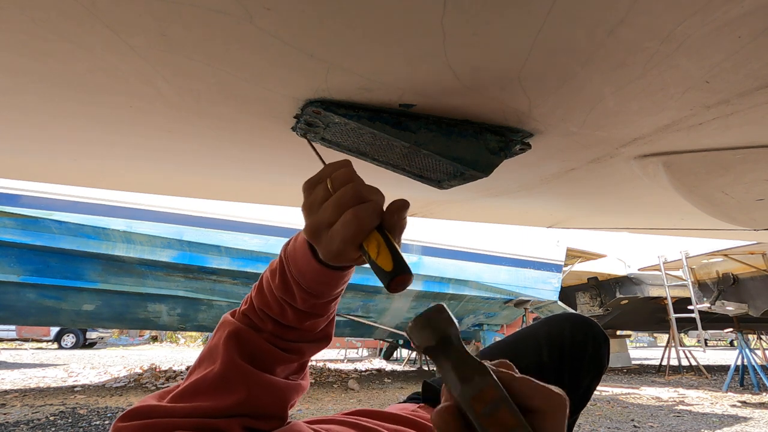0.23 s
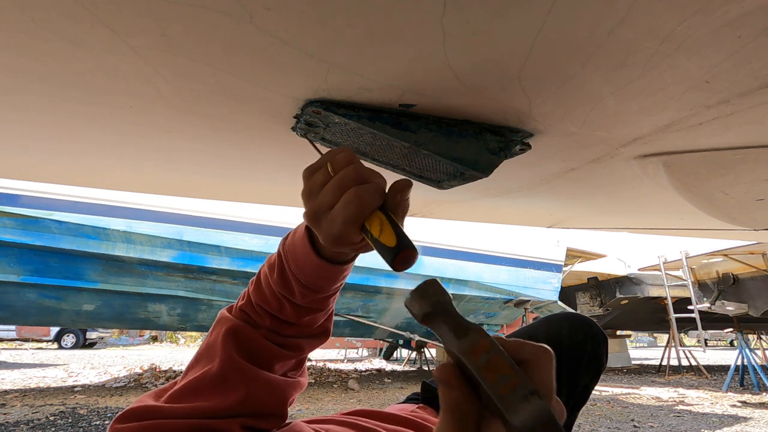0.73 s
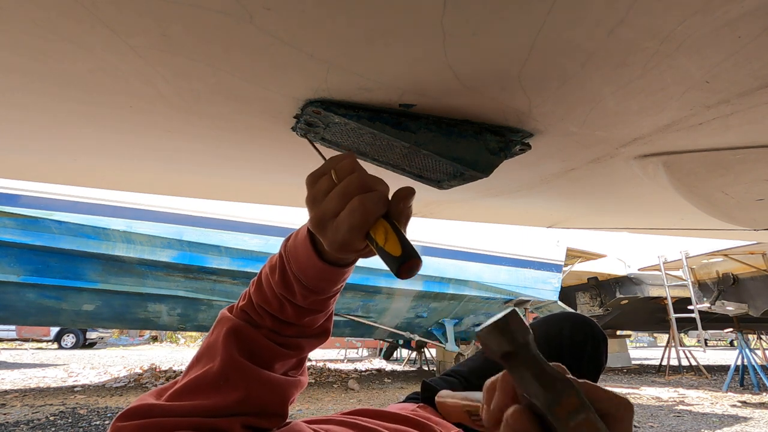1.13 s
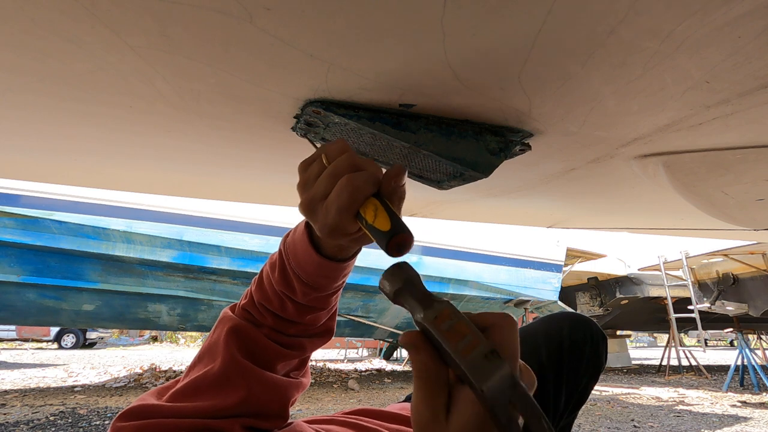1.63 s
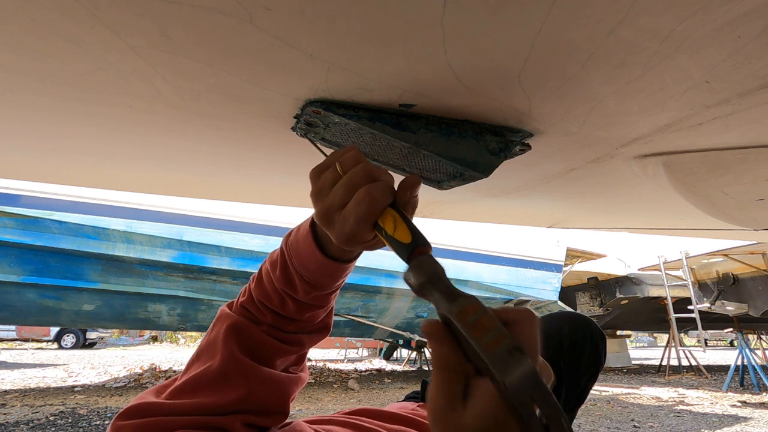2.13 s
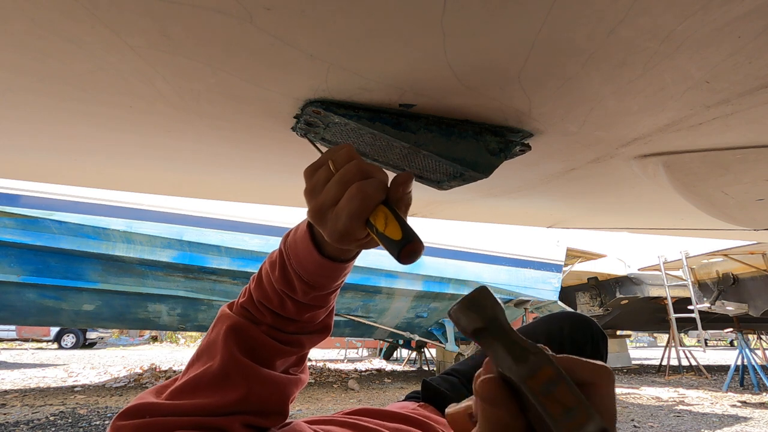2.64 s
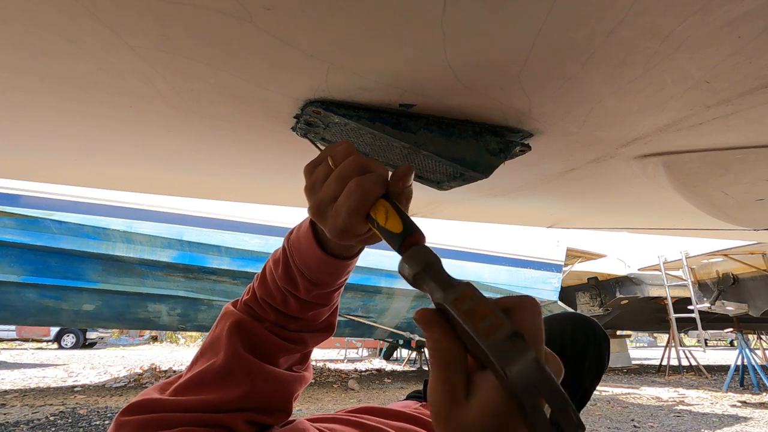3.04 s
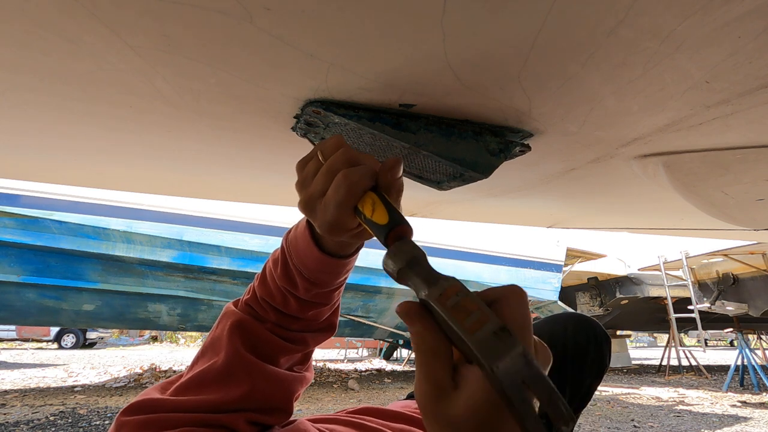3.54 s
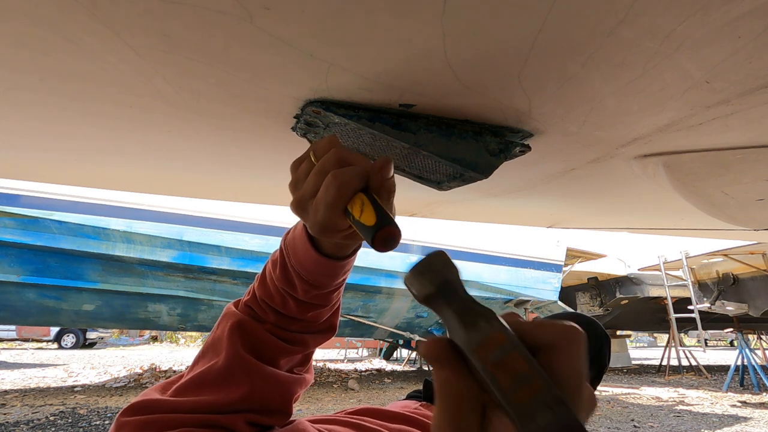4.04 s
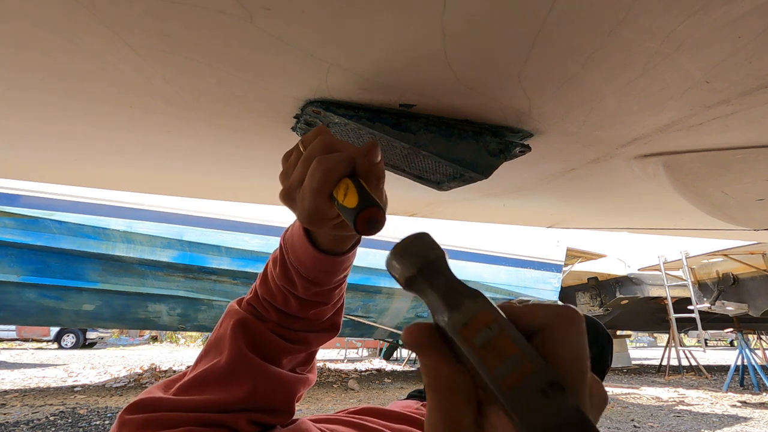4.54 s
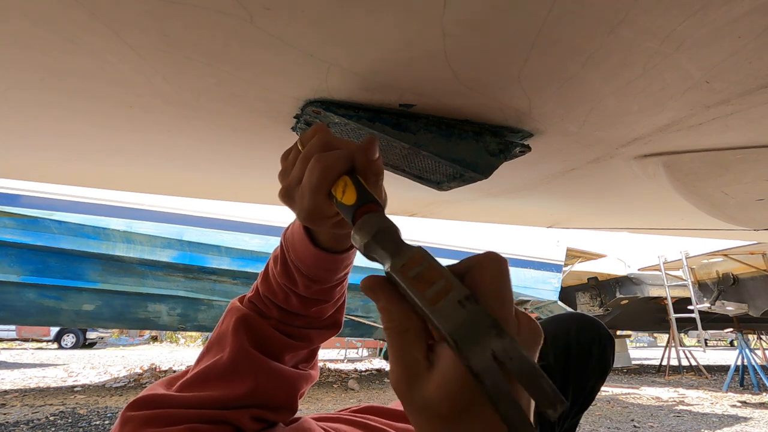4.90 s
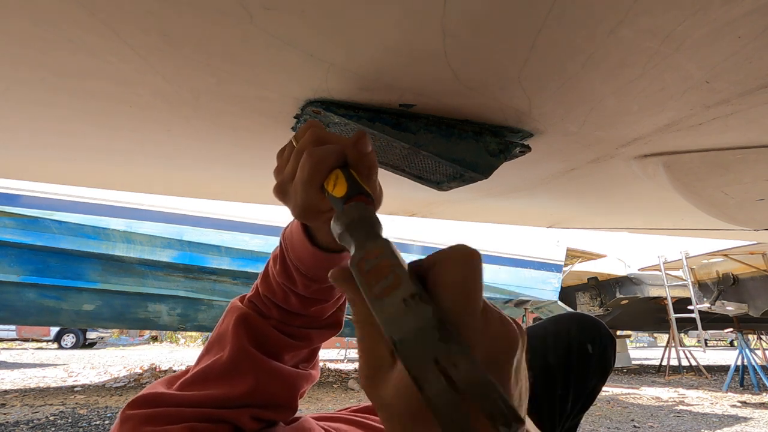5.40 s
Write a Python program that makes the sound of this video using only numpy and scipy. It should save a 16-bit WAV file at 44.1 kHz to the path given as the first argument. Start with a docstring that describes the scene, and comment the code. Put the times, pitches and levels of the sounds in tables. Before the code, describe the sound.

Even hammer taps on a screwdriver clack and drum against a hollow boat hull, echoing briefly beneath it.

```python
"""Freeing a stuck hull screw

Under a laid-up boat, a hammer taps a screwdriver handle in an even run. Each tap clacks on the handle,
drums the fibreglass hull and echoes under the boat. Blade and swinging hammer head ring faintly;
the tip chatters and ticks in the slot between taps, over quiet boatyard air."""
import sys
import numpy as np
from scipy import signal
from scipy.fft import rfft, irfft
from scipy.io import wavfile

SR = 44100
rng = np.random.default_rng(int(sys.argv[2]) if len(sys.argv) > 2 else 0)


def wav_record(signal):
    """Record a signal, one row per channel, as 16-bit PCM in the file named by sys.argv[1]."""
    frames = np.transpose(np.atleast_2d(signal))
    bounded = np.clip(frames, -1, 1)
    # unit amplitude maps onto the largest positive 16-bit level
    quanta = np.round(bounded * 32767).astype(np.int16)
    wavfile.write(sys.argv[1], SR, quanta)


N = 249779

# hammer blows (time [s], strength [dB], glancing edge [dB], blade ring [dB], head ring [dB])
TAPS = [(-0.15, 1.5, 0, 0, -2), (0.1543, -2, -7, -8.5, -6), (0.436, -2, 7.5, -0.5, 2),
        (0.744, -2.1, 0.5, -3, -8), (1.039, -1.3, -3.5, -1, -5.5), (1.349, -1.5, 2.5, -2.5, -1.5),
        (1.678, -1.4, -3.5, -2, 1.7), (1.9865, -1.55, -2.5, -0.5, 5.5), (2.279, -1.5, -1.5, 2.5, -1),
        (2.5722, -1.9, 5.5, 0.5, 2.5), (2.8528, -1.95, 0.5, -5, 2), (3.1189, -1.65, -1, -3.5, .5),
        (3.387, -2, 3, -5, 2.5), (3.659, -1.5, -2.5, -9, -8), (3.9454, -2.1, -2.5, -6, .7),
        (4.2108, -1.16, 0, -5, 2.5), (4.4916, -1.55, 0, 1, 1.5), (4.7549, -1.3, -1.5, -2, 3),
        (5.0154, -1.64, 0.5, 1.5, 2), (5.2784, -1.4, -1.5, 3, -8), (5.5224, -1.35, 4, 3, 6)]


def undb(db):
    """Decibels to gain."""
    return 10 ** (np.asarray(db) / 20)


def at(points, hz):
    """Read (Hz, value) points on a log-frequency axis."""
    point_hz, value = np.transpose(points)
    return np.interp(np.log(np.maximum(hz, 1)), np.log(point_hz), value)


def add(out, x, time_s):
    """Mix x into out from time_s, which may be negative."""
    start = int(round(time_s * SR))
    x, start = x[max(-start, 0):], max(start, 0)
    out[start:start + len(x)] += x[:len(out) - start]


def colour(x, points):
    """Filter x by (Hz, dB) points."""
    return irfft(rfft(x) * undb(at(points, np.fft.rfftfreq(len(x), 1 / SR))), len(x))


def click(db_at, spread_s=0, size=8192):
    """Causal click of a spectrum; bending waves bring the treble first, 1 kHz about spread_s late."""
    hz = np.fft.rfftfreq(size, 1 / SR)
    # folded cepstrum: all ringing follows the contact
    cepstrum = irfft(np.log(undb(db_at(hz))))
    cepstrum[1:size // 2] *= 2
    cepstrum[size // 2 + 1:] = 0
    lag_turns = 2 * spread_s * np.sqrt(hz * 1000)
    return irfft(np.exp(rfft(cepstrum) - 2j * np.pi * lag_turns))[:size // 2]


def fade(t60_s, size):
    """Exponential decay, 60 dB down at t60_s."""
    return np.exp(-np.log(1000) * np.arange(size) / SR / t60_s)


def rings(modes, size=SR):
    """One decaying sine per (Hz, dB, t60) row; neighbours swing in opposite directions."""
    t = np.arange(size) / SR
    return np.array([(-1) ** (k + 1) * undb(db) * np.sin(2 * np.pi * hz * t) * fade(t60_s, size)
                     for k, (hz, db, t60_s) in enumerate(modes)])


def envelope(t60_s, size, rise_s):
    """Rise and decay of unit energy."""
    shape = fade(t60_s, size) * (1 - np.exp(-np.arange(size) / SR / rise_s))
    return shape / np.linalg.norm(shape)


def tail(points, t60_s, size):
    """Dense modes as decaying noise with a (Hz, dB) spectrum."""
    return colour(rng.standard_normal(size), points) * envelope(t60_s, size, rise_s=0.0002)


def looseness(time_s, seating_s=2.71):
    """Play of the tip, falling as it beds into the slot."""
    return np.exp(-time_s / seating_s)


def grip(time_s, from_s=4.4, over_s=0.96):
    """The hand closes round the handle late in the run, 0 to 1."""
    return np.clip((time_s - from_s) / over_s, 0, 1)


def blow_tint(time_s, strength_db, edge_db):
    """(Hz, dB) tint of one blow, set by strength, seating, grip and glancing contact."""
    # clack bands (centre [Hz], seated [dB], extra if loose [dB], extra at full grip [dB], edge share [-])
    bands = [(750, 4.5, -8, 0.5, 0), (1350, -1.5, 1.5, 3, 0), (2270, 1.65, -0.8, -5, 0.081),
             (3450, 10.5, -20.5, -1, 0.95), (5200, 3, -4, -0.5, 0.33)]
    hz, seated_db, loose_db, grip_db, edge_share = np.transpose(bands)
    contact_db = seated_db + looseness(time_s) * loose_db + grip(time_s) * grip_db
    return np.c_[hz, strength_db + contact_db + edge_share * edge_db]


def handle_clack(lead_s=0.0004, spread_s=0.00042, ripple_db=0.85):
    """Steel meets the handle, never on quite the same spot."""
    # contact spectrum (frequency [Hz], level [dB])
    spectrum = [(300, -5), (700, 5), (1100, 3), (1600, 4), (1830, -3), (2000, 7), (2750, 4), (2980, -16),
                (3350, -4), (4000, -15), (4800, -12), (6300, -18), (10500, -35.5), (15500, -43.5)]
    out = np.zeros(N)
    for time_s, db, edge_db, *_ in TAPS:
        tint = blow_tint(time_s, db, edge_db)
        spot = np.c_[np.geomspace(1000, 16000, 40), ripple_db * rng.standard_normal(40)]
        clack = click(lambda hz: at(spectrum, hz) + at(tint, hz) + at(spot, hz), spread_s)
        add(out, clack, time_s - lead_s)
    return out


def hull_drum(lag_s=0.00096, scatter_db=0.73, upper_db=-3.0, loose_db=5.5, sharp=0.034, settle_s=1.2):
    """The heavy panel answers just after contact; a loose tip stirs more of its upper modes."""
    # panel modes (frequency [Hz], level [dB], t60 [s])
    modes = [(55.4, -54, 0.5), (74.5, -50, 0.055), (106.1, -51.5, 0.72), (114.53, -50, 1),
             (124.1, -32, 0.2), (143, -27.5, 0.13), (146.85, -50.5, 0.98), (165, -62.5, 0.49),
             (166, -60, 1), (188, -65.5, 0.64), (209.9, -41.5, 0.38), (230.4, -36.5, 0.19),
             (256.8, -48, 0.79), (268.3, -30.5, 0.19), (302.15, -18.5, 0.107), (298.84, -26.5, 0.16),
             (328.7, -20.5, 0.074), (354.1, -35.5, 0.2), (371.9, -21.5, 0.16), (372.4, -20.0, 0.12),
             (394.6, -56, 0.76), (431.4, -47, 0.55), (430.3, -57, 0.7), (443.2, -37, 0.1),
             (521.6, -23.0, 0.084), (521.7, -19, 0.055), (551.8, -44.5, 0.19), (583.8, -38.5, 0.12)]
    out, ringing, samples = np.zeros(N), rings(modes), np.arange(SR)
    upper_share = np.interp(np.array(modes)[:, 0], [320, 420], [0, 1])
    for time_s, db, *_ in TAPS:
        tilt_db = (upper_db + looseness(time_s) * loose_db) * upper_share
        panel = undb(db + tilt_db + scatter_db * rng.standard_normal(len(modes))) @ ringing
        pitch = 1 + sharp * np.exp(-time_s / settle_s)  # first blows knock higher
        add(out, np.interp(samples * pitch, samples, panel, right=0), time_s + lag_s)
    return out


def hull_buzz(t60_s=0.039):
    """The hull's dense upper modes blur into a short noise burst."""
    # burst spectrum (frequency [Hz], level [dB])
    spectrum = [(300, -11), (600, 5), (1000, -4), (2600, -2), (3400, -19.5), (4200, -23.5), (6000, -27.5),
                (9000, -46.5), (15000, -67.5)]
    out = np.zeros(N)
    for time_s, db, edge_db, *_ in TAPS:
        tint = blow_tint(time_s, db, edge_db)
        hz = np.union1d(np.array(spectrum)[:, 0], tint[:, 0])
        add(out, tail(np.c_[hz, at(spectrum, hz) + at(tint, hz)], t60_s, size=4096), time_s)
    return out


def fitting_ring():
    """Each blow briefly rings the handle and the hull fitting."""
    # handle and fitting modes (frequency [Hz], level [dB], t60 [s])
    modes = [(706, -45.5, 0.064), (830, -51.5, 0.21), (1152, -50.5, 0.053), (1464, -52, 0.042),
             (1930, -45, 0.068), (2506, -50.5, 0.008), (2770, -52, .04), (2926, -45, 0.025),
             (3190, -45.5, 0.016), (4660, -53, 0.022), (5360, -58.5, .02)]
    out, ringing, mode_hz = np.zeros(N), rings(modes), np.array(modes)[:, 0]
    for time_s, db, edge_db, *_ in TAPS:
        tint = blow_tint(time_s, db, edge_db)
        add(out, undb(at(tint, mode_hz)) @ ringing, time_s)
    return out


def echo_response(build_s=0.012, bands=12):
    """Scatter between hull, ground and nearby boats; the lows linger."""
    # echo spectrum (frequency [Hz], level [dB])
    spectrum = [(50, -9.5), (130, 9), (200, 2.5), (310, 12.5), (420, 0), (560, -1.5), (800, -9),
                (1200, -18.5), (2000, -16), (2800, -18.5), (3600, -33), (5600, -39), (8000, -58.5),
                (15000, -77.5)]
    # echo decay (frequency [Hz], t60 [s])
    decay = [(120, 0.76), (320, 0.6), (700, 0.39), (2300, 0.36), (3800, 0.25), (6000, 0.067), (12000, 0.1)]
    hz, centres_hz = np.fft.rfftfreq(SR, 1 / SR), np.geomspace(60, 14000, bands)
    noise_bins = rfft(colour(rng.standard_normal(SR), spectrum))
    out = np.zeros(SR)
    for centre_hz, share in zip(centres_hz, np.eye(bands)):
        band = irfft(noise_bins * at(np.c_[centres_hz, share], hz), SR)
        out += band * envelope(at(decay, centre_hz), SR, build_s)
    return out


def boat_echo(change=0.31, paths=4):
    """Each blow echoes under the boat; the moving arms change some of the paths."""
    out, still = np.zeros(N), echo_response()
    moving = np.array([echo_response() for _ in range(paths)]) / np.sqrt(paths)
    for time_s, db, *_ in TAPS:
        shifted = change * rng.standard_normal(paths) @ moving
        add(out, undb(db) * (still + shifted) / np.hypot(1, change), time_s)
    return out


def attack_fizz(level_db=-16.0, step_s=0.012, step_db=14.5, t60_s=0.16):
    """A faint fizz swells in two steps ahead of each blow and softens its attack."""
    # fizz spectrum (frequency [Hz], level [dB])
    spectrum = [(150, -8), (400, 14), (1000, -2), (3000, -3.5), (4500, -22.5), (6500, -32.5), (10000, -49)]
    out = np.zeros(N)
    for time_s, *_ in TAPS:
        for step in range(2):
            fizz = undb(level_db - step_db * step) * tail(spectrum, t60_s, size=2048)
            add(out, fizz, time_s - (step + 1) * step_s)
    return out


def blade_ring(damping=0.5, grip_lean_db=7.0, scatter_db=2.2):
    """Two blade modes, damped more as the hand slides up; a full grip favours the lower."""
    # blade modes (frequency [Hz], level [dB], mid-run t60 [s])
    modes = [(4330, -64, 0.11), (4460, -62, 0.14)]
    out = np.zeros(N)
    for time_s, _, _, blade_db, _ in TAPS:
        t60_scale = np.exp(damping * (0.5 - time_s * SR / N))
        ringing = rings(np.array(modes) * [1, 1, t60_scale], size=16384)
        lean_db = grip(time_s) * grip_lean_db + scatter_db * rng.standard_normal()
        add(out, undb([blade_db + lean_db, blade_db - lean_db]) @ ringing, time_s)
    return out


def hammer_ring(facing_turns=0.25, sway_turns=0.097, recoil_turns=0.19, reflection=0.15):
    """The head rings on between blows; its dead side passes the listener twice a swing."""
    # head mode (frequency [Hz], level [dB], t60 [s])
    mode = (5932, -84, 5.9)
    hz, db, t60_s = mode
    t, taps_s, power = np.arange(N) / SR, np.array(TAPS)[:, 0], np.zeros(N)
    for time_s, *_, ring_db in TAPS:
        add(power, (undb(db + ring_db) * fade(t60_s, N)) ** 2, time_s)
    beats_s = np.append(taps_s, 2 * taps_s[-1] - taps_s[-2])
    swing = np.interp(t, beats_s, np.arange(len(beats_s)))
    swing += recoil_turns * np.sin(np.pi * swing) ** 2  # rebound is faster than approach
    strokes = np.arange(2 * len(beats_s)) / 2
    swing += np.interp(swing, strokes, sway_turns * rng.standard_normal(len(strokes)))
    direct = np.cos(2 * np.pi * (swing - facing_turns)) * np.sin(2 * np.pi * hz * t)
    off_hull = reflection * np.cos(2 * np.pi * hz * t)  # fills the nulls
    return np.sqrt(power) * (direct + off_hull)


def tip_chatter(level_db=-58.5, from_s=0.021, over_s=0.05, scatter_db=3.0, t60_s=0.02, slips=30):
    """As the handle springs back, the tip grates into the slot in tiny slips, more once seated."""
    # slip spectrum (frequency [Hz], level [dB])
    spectrum = [(1500, -17.5), (3500, -2.5), (5200, 2), (7500, -6), (10000, -22), (15000, -38)]
    out = np.zeros(N)
    for time_s, db, *_ in TAPS[1:]:
        seated = 1 - looseness(time_s)
        for _ in range(slips):
            slip = tail(spectrum, t60_s, size=1024)
            gain = seated * undb(level_db + db + scatter_db * rng.standard_normal())
            add(out, gain * slip, time_s + from_s + over_s * rng.random())
    return out


def tip_ticks(t60_s=0.022, faint_db=-67.5, faint_from_s=1.8, faint_count=16):
    """The tip shifts in the slot: a click with a short scrape; fainter ones join later."""
    # tip shifts (time [s], peak [dB])
    shifts = [(0.5102, -59), (0.5224, -61), (2.4433, -57), (2.6968, -65.5), (2.7702, -56.5), (3.5339, -53),
              (4.6147, -64), (5.2345, -73)]
    # tick spectrum (frequency [Hz], level [dB])
    spectrum = [(800, -10), (2500, 5), (4500, 7.5), (7000, -2.5), (10000, -13.5), (15000, -22.5)]
    faint_shifts = np.c_[rng.uniform(faint_from_s, N / SR, faint_count),
                         rng.uniform(faint_db - 6, faint_db, faint_count)]
    out, snap = np.zeros(N), click(lambda hz: at(spectrum, hz))
    for time_s, peak_db in np.vstack([shifts, faint_shifts]):
        tick = snap + tail(spectrum, t60_s, len(snap))
        add(out, undb(peak_db) * tick / np.abs(tick).max(), time_s)
    return out


def yard_air(air_db=-68.5, hiss_db=-93.0, hiss_end_s=0.43):
    """Low outdoor murmur and a faint narrow hiss that soon stops."""
    # air spectrum (frequency [Hz], relative density [dB])
    air_spectrum = [(20, -19), (60, -11), (120, -3.5), (300, -9), (600, -27), (850, -31.5), (940, -22.5),
                    (1100, -36), (2500, -38), (5000, -51), (15000, -68)]
    hiss_spectrum = [(1500, -46.5), (3000, -21), (4100, 0.5), (5200, -25.5), (8000, -53.5)]
    air = colour(rng.standard_normal(N), air_spectrum)
    hiss = colour(rng.standard_normal(N), hiss_spectrum)
    gate = np.interp(np.arange(N) / SR, [hiss_end_s, hiss_end_s + 0.05], [1, 0])
    return undb(air_db) * air / air.std() + undb(hiss_db) * gate * hiss / hiss.std()


def scene():
    """Mono sum of all sources."""
    blows = boat_echo() + handle_clack() + hull_drum() + hull_buzz() + fitting_ring() + attack_fizz()
    tools = blade_ring() + hammer_ring() + tip_chatter() + tip_ticks()
    return (blows + tools + yard_air())[None]


def record(dry, ceiling=0.15, low_cut_hz=42, high_cut_hz=16300):
    """Round the sharpest peaks; cut rumble and top."""
    rounded = dry / (1 + (dry / ceiling) ** 6) ** (1 / 6)
    low_cut = signal.butter(4, low_cut_hz, "highpass", fs=SR, output="sos")
    high_cut = signal.ellip(8, 0.2, 70, high_cut_hz, fs=SR, output="sos")
    return signal.sosfilt(high_cut, signal.sosfilt(low_cut, rounded))


dry = scene()
out = record(dry)
wav_record(out)
```